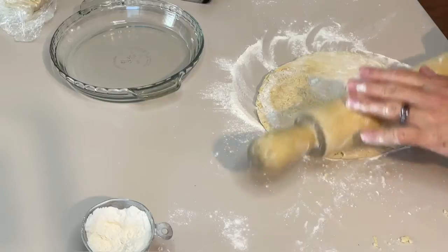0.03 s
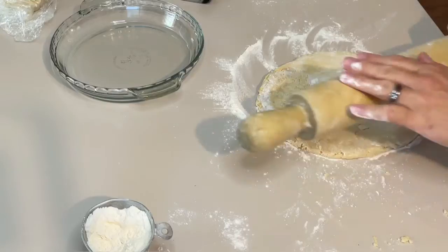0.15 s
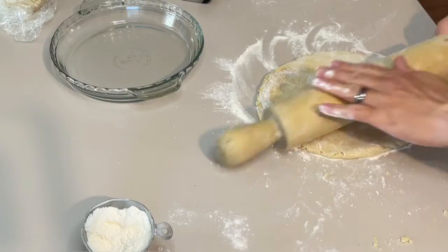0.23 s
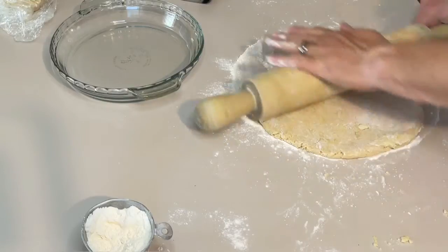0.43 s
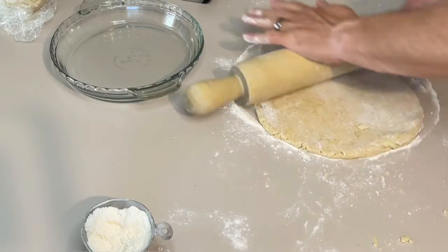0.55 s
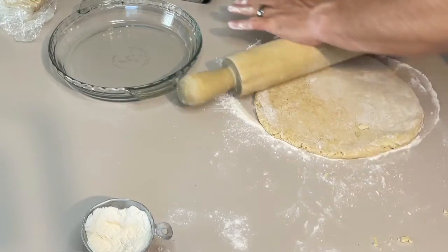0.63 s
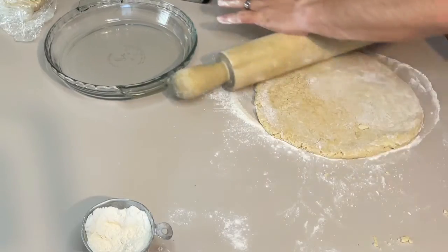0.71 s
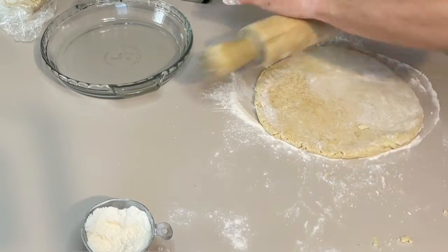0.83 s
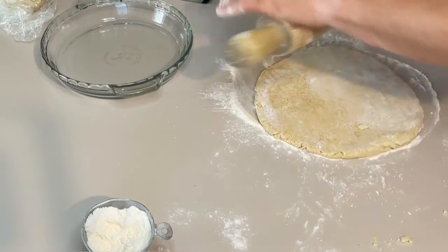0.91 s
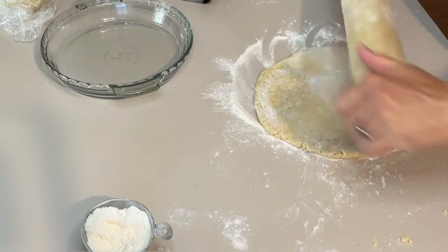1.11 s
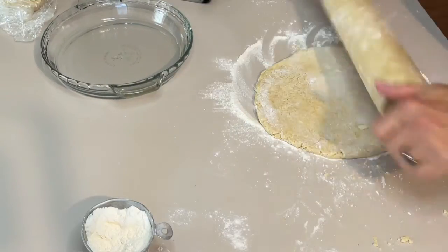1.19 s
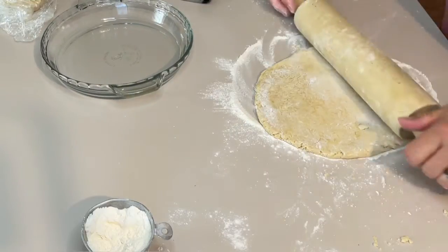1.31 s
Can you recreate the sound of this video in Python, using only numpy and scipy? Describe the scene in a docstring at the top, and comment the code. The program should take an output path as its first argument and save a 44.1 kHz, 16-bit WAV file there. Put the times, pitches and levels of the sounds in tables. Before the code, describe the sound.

Wooden rolling pin knocking sharply on a floured counter, with soft rubbing and a faint appliance hum

```python
"""In a small kitchen, a wooden rolling pin is pushed over floured dough on the counter and swung round.
It drops with a thud and clacks, knocks and rattles off the far edge of the dough, and is lightly tapped.
Blows are sums of decaying modes, with a kitchen echo; palm, flour, rumble and air are shaped noise.
Resonators fed with noise make the barrel's rub, and steady sines make an appliance's hum."""
import sys
import numpy as np
from scipy import signal
from scipy.fft import rfft, irfft
from scipy.io import wavfile
from scipy.ndimage import uniform_filter1d

SR = 44100
rng = np.random.default_rng(int(sys.argv[2]) if len(sys.argv) > 2 else 0)


def store_pcm(level_fs):
    """Save levels as 16-bit WAV."""
    pcm = np.round(np.clip(level_fs, -1, 1) * 32767).astype(np.int16)
    wavfile.write(sys.argv[1], SR, np.atleast_2d(pcm).T)


N = 59535
T = np.arange(N) / SR  # s
LEFT_RIGHT = np.array([[1], [-1]])  # opposite signs for the two channels


def from_db(db):
    """Amplitude ratio: 20 dB is a factor of ten."""
    return 10 ** (np.asarray(db) / 20)


def rms_one(x):
    """Normalisation to unit root mean square."""
    return x / np.sqrt(np.mean(x ** 2) + 1e-20)


def level(rows):
    """Amplitude envelope: linear interpolation in decibels over time."""
    return from_db(np.interp(T, *np.transpose(rows)))


def at_hz(points, hz):
    """Spectral interpolation on a logarithmic frequency axis."""
    f, value = np.transpose(points)
    return np.interp(np.log(np.maximum(hz, 1)), np.log(f), value)


def decay(age, t60):
    """Exponential decay: the amplitude falls by 60 dB in t60 seconds."""
    return np.exp(-np.log(1000) * age / t60)


def lowpass(x, hz):
    """Second-order Butterworth filtering: the spectrum falls 12 dB per octave above hz."""
    return signal.sosfilt(signal.butter(2, hz, fs=SR, output="sos"), x)


# likeness of diffuse sound at the two microphone ports: (f/Hz, correlation)
PORT_LIKENESS = [(60, 0.94), (200, 0.93), (400, 0.61), (750, 0.18), (1200, 0.4), (2200, 0.78), (6000, 0.85),
                 (10000, 0.97)]


def diffuse():
    """Diffuse-field coherence: stereo white noise whose channels agree by a set amount at each frequency."""
    mid, side = rfft(rng.standard_normal((2, N)))
    alike = np.clip(at_hz(PORT_LIKENESS, np.fft.rfftfreq(N, 1 / SR)), -1, 1)
    common = np.sqrt(1 + alike) * mid
    opposed = np.sqrt(1 - alike) * side * LEFT_RIGHT
    return irfft(common + opposed, N) / np.sqrt(2)


def noise(colour):
    """Spectral shaping: diffuse noise weighted by frequency, rms 1."""
    gain = from_db(at_hz(colour, np.fft.rfftfreq(N, 1 / SR)))
    return rms_one(irfft(rfft(diffuse()) * gain, N))


def grainy(x, depth_db):
    """Random amplitude modulation: noise breaks into uneven grains of about a millisecond, rms 1."""
    strength = rms_one(uniform_filter1d(rng.standard_normal(N), size=40))
    return rms_one(x * from_db(depth_db * strength))


def strike(blows, modes):
    """Modal superposition: every blow starts a set of decaying sines."""
    out = np.zeros(N)
    for s, db in blows:
        age = np.maximum(T - s, 0)
        for hz, mode_db, t60 in modes:
            out += from_db(db + mode_db) * decay(age, t60) * np.sin(2 * np.pi * hz * age)
    return out


def alternate(modes, blows):
    """Modal phase: neighbouring modes swing in opposite directions."""
    return strike(blows, modes[::2]) - strike(blows, modes[1::2])


def soften(x, contact_s):
    """Contact-time filtering: a longer contact excites less treble, through one pole at 1 / contact_s Hz."""
    r = np.exp(-2 * np.pi / (contact_s * SR))
    return signal.lfilter([1 - r], [1, -r], x)


# air noise in the room: (f/Hz, relative density/dB)
AIR_COLOUR = [(25, 9.5), (45, 6.5), (75, -0.5), (130, -1.5), (200, 0), (340, -1.5), (550, -13), (1000, -22),
              (2000, -29), (2400, -23), (2700, -48), (3500, -61), (4400, -29), (6000, -39), (12000, -52)]
# the appliance's partials: (f/Hz, rms level/dB)
HUM_PARTIALS = [(79, -64), (157, -65.5), (236.5, -79), (316, -66.5), (2420, -85)]


def room_tone():
    """Stationary background: low broadband air noise plus steady partials in random phase."""
    hum = np.zeros(N)
    for hz, db in HUM_PARTIALS:
        hum += np.sqrt(2) * from_db(db) * np.sin(2 * np.pi * (hz * T + rng.random()))
    return from_db(-52) * noise(AIR_COLOUR) + hum


# palm and flour sliding on the wood: (t/s, level/dB before the overall swish gain)
SWISH_LEVEL = [(0.0, -70), (0.018, -75.5), (0.048, -70.5), (0.202, -76.5), (0.248, -49.5), (0.296, -55),
               (0.356, -54), (0.446, -63.5), (0.582, -67), (0.59, -61.5), (0.728, -59.5), (0.778, -69.5),
               (0.89, -56.5), (0.92, -67.5), (0.936, -50.5), (1.04, -57.5), (1.052, -53), (1.086, -61),
               (1.202, -53), (1.266, -61), (1.296, -59), (1.35, -61)]
# spectrum of that sliding: (f/Hz, relative density/dB)
SLIDE_COLOUR = [(1500, -8), (3000, -4), (4000, -9), (6000, -6.5), (8000, -0.5), (9500, 2), (11200, 8),
                (11700, -1.5), (12200, -11), (13000, -13)]


def swish():
    """Granular friction: fine grains of flour slide between skin and wood."""
    overall_gain = from_db(2.5)
    return overall_gain * level(SWISH_LEVEL) * grainy(noise(SLIDE_COLOUR), depth_db=1)


# the barrel rubbing on its axle: (t/s, level/dB)
RUB_LEVEL = [(0, -91), (.2, -71), (.3, -51.5), (.42, -55), (.55, -65), (.62, -66), (.72, -45), (.8, -59),
             (.92, -69), (.95, -63), (1.05, -60.5), (1.1, -72), (1.15, -58), (1.19, -58), (1.23, -60),
             (1.26, -65), (1.35, -61)]
# the barrel's resonances: (f/Hz, bandwidth/Hz, relative level/dB)
RUB_RESONANCES = [(1140, 88, 18), (1193, 33, 19), (1644, 140, 18), (1830, 50, 18), (2370, 46, -23),
                  (2878, 38, 12.5), (3100, 42, -11), (5460, 110, -12)]


def rub():
    """Resonant filtering: broadband friction excites narrow resonances of the barrel."""
    friction = diffuse()
    out = 0
    for hz, width_hz, db in RUB_RESONANCES:
        b, a = signal.iirpeak(hz, hz / width_hz, fs=SR)
        out = out + from_db(db) * signal.lfilter(b, a, friction)
    return level(RUB_LEVEL) * rms_one(out)


# the barrel against its handles: (t/s, level/dB, contact time/s)
HANDLE_CLACKS = [(0.228, -34.5, 0.000067), (0.234, -14, 0.00041), (0.2469, -13.5, 0.00043)]
# heavily damped modes of the clack: (f/Hz, relative level/dB, t60/s)
HANDLE_MODES = [(296.5, -9, 0.069), (454, -9, 0.05), (592.4, -16, 0.136), (695.5, -8, 0.049),
                (1055, -2.5, 0.0087), (1382, -8.5, 0.015), (1705, -6, 0.013), (2046, -7, 0.0086),
                (2650, -18.5, 0.012), (3120, -14.5, 0.0095), (4240, -14.5, 0.0024), (5700, -16.5, 0.0033)]


def clack():
    """Damped impact: the barrel strikes its handles and excites short-lived modes."""
    out = np.zeros(N)
    for s, db, contact_s in HANDLE_CLACKS:
        out -= soften(alternate(HANDLE_MODES, [(s, db)]), contact_s)
    return out


# the pin's weight landing on the counter: (t/s, level/dB)
THUD_BLOWS = [(0.231, -20), (0.2357, -12.5), (0.2432, -8.5), (0.2875, -22), (0.2995, -23), (0.383, -42),
              (1.293, -49), (1.322, -56)]
# low modes of the counter: (f/Hz, relative level/dB, t60/s)
COUNTER_MODES = [(71, -16, 0.5), (84.9, -6.5, 0.2), (106, -8, 0.14), (123, 2.5, 0.083),
                 (156.2, -14.5, 0.14), (180.5, -13.5, 0.229), (227.4, -16.5, 0.25), (289.8, -16.5, 0.23),
                 (312.7, -7, 0.071), (374.8, -28, 0.33), (427, -26, 0.16), (468, -40, 0.055),
                 (591.4, -23.5, 0.24), (692.5, -18, 0.071), (766, -19.5, 0.16)]


def thud():
    """Plate resonance: the pin's weight sets the counter's low modes ringing."""
    return lowpass(strike(THUD_BLOWS, COUNTER_MODES), 600)


KNOCK_S, KNOCK_DB, KNOCK_CONTACT_S = 0.5888, -18.5, 0.00037
# ringing modes of the pin: (f/Hz, relative level/dB, t60/s)
PIN_RING_MODES = [(227.5, -7, 0.18), (326, -2.5, 0.03), (459, -4.5, 0.066), (573.5, -6, 0.078),
                  (692.2, -4.5, 0.19), (822, -9, 0.16), (1000, -8.5, 0.031), (1243.6, -3, 0.16),
                  (1440, -5.5, 0.017), (1774, -6, 0.042), (2685, -10, 0.088), (3644, -22, 0.18),
                  (5870, -43, 0.075), (6650, -36, 0.23)]


def knock():
    """Free vibration: the barrel strikes the bare counter and the pin rings in its own modes."""
    return soften(alternate(PIN_RING_MODES, [(KNOCK_S, KNOCK_DB)]), KNOCK_CONTACT_S)


def after_knock(t60, attack_s):
    """Transient envelope: a linear rise from the knock multiplied by an exponential decay."""
    age = np.maximum(T - KNOCK_S, 0)
    return np.minimum(age / attack_s, 1) * decay(age, t60)


# the knock's first crack: (f/Hz, relative density/dB)
CRACK_SPECTRUM = [(150, -23), (500, 5.5), (1500, -2.5), (2200, -12.5), (3200, -17), (4200, -25),
                  (6000, -23.5), (9000, -44)]


def crack():
    """Impact noise: a fast-rising broadband burst begins with the knock."""
    return from_db(-31) * after_knock(t60=0.057, attack_s=0.00094) * noise(CRACK_SPECTRUM)


RATTLES_PER_S, RATTLE_DB, RATTLE_SPREAD_DB = 150, -32, 6.5


def rattle():
    """Random impact train: small uneven bounces on the counter excite the clack's modes and die away."""
    born = rng.random(N) < RATTLES_PER_S / SR
    strength = from_db(RATTLE_DB + RATTLE_SPREAD_DB * rng.standard_normal(N))
    clicks = born * strength * after_knock(t60=0.63, attack_s=0.016)
    bounce = alternate(HANDLE_MODES, [(0.0038, 0)])  # sounds 3.8 ms after its click
    return signal.fftconvolve(clicks, bounce)[:N]


# the counter's rumble: (f/Hz, relative density/dB)
RUMBLE_SPECTRUM = [(60, -44), (105, 0), (145, -1), (185, -3.5), (300, -13.5), (600, -47), (2000, -57)]


def rumble():
    """Low-frequency reverberation: the counter rumbles on after the knock, as decaying noise."""
    return from_db(-32.5) * after_knock(t60=0.47, attack_s=0.016) * noise(RUMBLE_SPECTRUM)


GRIT_START_S, GRIT_END_S, GRIT_FADE_S = 0.62, 0.7104, 0.033
# flour crushed under the barrel: (f/Hz, relative density/dB)
GRIT_SPECTRUM = [(120, 2), (300, 2), (700, 14), (1500, 14), (2400, 3.5), (3000, 2.5), (4000, -6),
                 (6000, -5), (8000, -36), (13000, -37)]


def grit():
    """Granular crushing: loose flour crackles while the barrel rolls on the bare counter."""
    inside_s = np.minimum(T - GRIT_START_S, GRIT_END_S - T)
    rolling = np.clip(inside_s / GRIT_FADE_S + 0.5, 0, 1)  # half height at the start and end
    return from_db(-42.5) * rolling * grainy(noise(GRIT_SPECTRUM), depth_db=2)


# the palm leaving the barrel: (middle t/s, standard deviation/s, level/dB)
PALM_SCUFFS = [(0.96, 0.0097, -58), (1.049, .014, -61.5)]
# spectrum of skin on wood: (f/Hz, relative density/dB)
PALM_COLOUR = [(600, -11), (1400, -8), (1700, 5), (2400, -3), (2900, 12), (3600, -9), (5400, 4),
               (8000, -32)]


def scuffs():
    """Friction noise: skin slides on wood in short Gaussian swells."""
    swell = np.zeros(N)
    for s, deviation_s, db in PALM_SCUFFS:
        swell += from_db(db) * np.exp(-0.5 * ((T - s) / deviation_s) ** 2)
    return swell * grainy(noise(PALM_COLOUR), depth_db=-1.5)


# modes of the light tap: (f/Hz, relative level/dB, t60/s)
LIGHT_TAP_MODES = [(850, -6, 0.013), (1084, -6, 0.03), (1360, -11, 0.013), (1670, -4, 0.025)]


def tap():
    """Weak impact: a light tap, as the pin is turned round, excites four brief modes."""
    return alternate(LIGHT_TAP_MODES, [(0.9778, -39.5)])  # t/s, level/dB


def echo(t60, delay_s):
    """Reverberant decay at unit energy: silent for delay_s, then rising over another delay_s."""
    shape = decay(T, t60) * np.clip(T / delay_s - 1, 0, 1)
    return shape / np.sqrt(np.sum(shape ** 2))


# spectrum of the kitchen's echo: (f/Hz, gain/dB)
ECHO_COLOUR = [(50, -16), (120, -10.5), (250, -5.5), (600, -0.5), (1200, -3.5), (2000, -4.5), (2700, -0.5),
               (3600, -11), (6000, -0.5), (13000, -20)]
# decay of the late echo: (f/Hz, t60/s)
ECHO_T60 = [(80, 0.39), (260, 0.4), (700, 0.51), (1800, 0.47), (5000, 0.61), (12000, 0.17)]


def kitchen(x):
    """Room impulse response: quick reflections off counter and dishes, then a tail that dies band by band."""
    hz = np.fft.rfftfreq(N, 1 / SR)
    centres = np.geomspace(60, 12000, 9)  # Hz
    late = rfft(diffuse())
    response = from_db(-3.5) * diffuse() * echo(t60=0.056, delay_s=0.0013)
    for centre, share in zip(centres, np.eye(len(centres))):
        # neighbouring bands crossfade between their centres
        band = irfft(late * at_hz(np.c_[centres, share], hz), N)
        response = response + from_db(-4) * band * echo(at_hz(ECHO_T60, centre), delay_s=0.0069)
    response = irfft(rfft(response) * from_db(at_hz(ECHO_COLOUR, hz)), N)[:, :N // 2]
    return signal.fftconvolve(x[None], response, axes=1)[:, :N]


def blows():
    """Direct and reverberant sound: the impacts plus their kitchen echo, the knock's echo being duller."""
    clacks, thuds, knocked, tapped = clack(), thud(), knock(), tap()
    sent = from_db(2) * clacks + from_db(1) * thuds
    sent = sent + from_db(-0.5) * lowpass(knocked, 2080) + from_db(-1) * tapped
    knock_right = knocked * from_db(-0.5 * LEFT_RIGHT)
    return clacks + thuds + knock_right + tapped + kitchen(sent)


def scene():
    """Linear superposition: all sources add, with the sum slightly to the left."""
    impacts = blows() + rattle() + rumble() + crack()
    sliding = swish() + scuffs() + rub() + grit()
    return (impacts + sliding + room_tone()) * from_db(0.38 * LEFT_RIGHT)


# phase between the microphone ports: (f/Hz, left's lead/rad)
PORT_LEAD = [(100, 0), (700, -.1), (1400, -.3), (2100, 0), (3000, .65), (5400, .5), (6700, 0), (7700, .7),
             (8800, -.15), (9300, -1.6), (10280, -3.14), (10900, -4.1), (11900, -6.25)]


def record(dry):
    """Microphone transfer function: port phase differs with frequency, and deep bass and top are cut."""
    hz = np.fft.rfftfreq(2 * N, 1 / SR)
    ports = np.exp(0.5j * at_hz(PORT_LEAD, hz) * LEFT_RIGHT)
    x = irfft(rfft(dry, 2 * N) * ports)[:, :N]
    x = signal.sosfilt(signal.butter(6, 52.6, "high", fs=SR, output="sos"), x)
    # 0.2 dB passband ripple, 80 dB stopband loss
    return signal.sosfilt(signal.ellip(10, 0.2, 80, 12900, fs=SR, output="sos"), x)


dry = scene()
out = record(dry)
store_pcm(out)
```